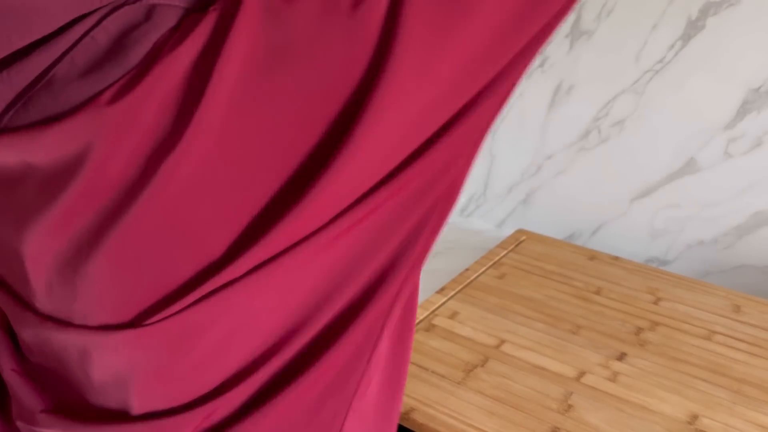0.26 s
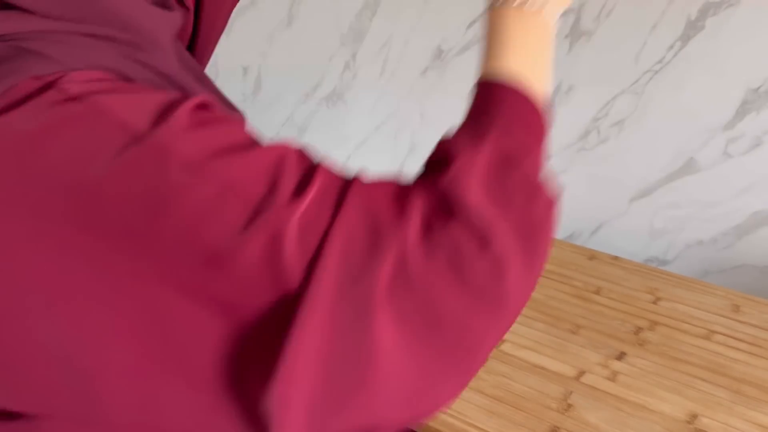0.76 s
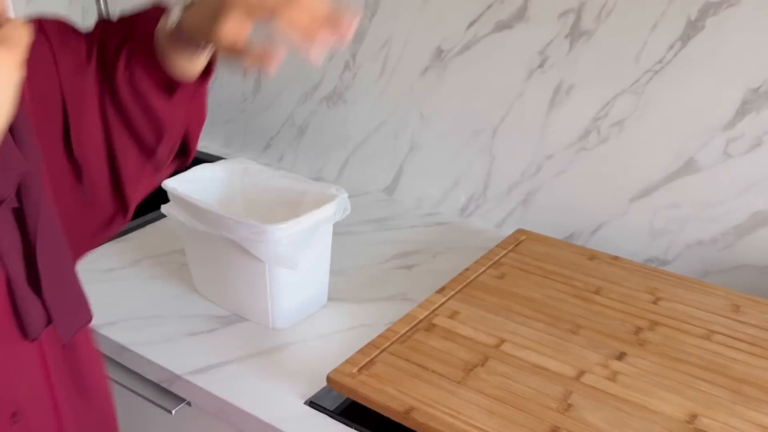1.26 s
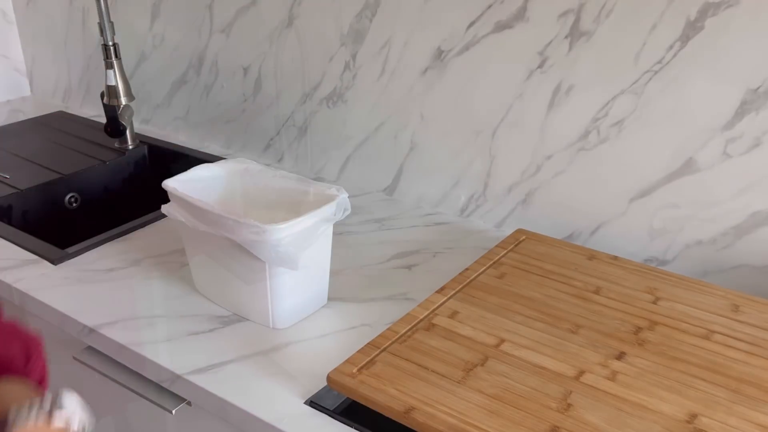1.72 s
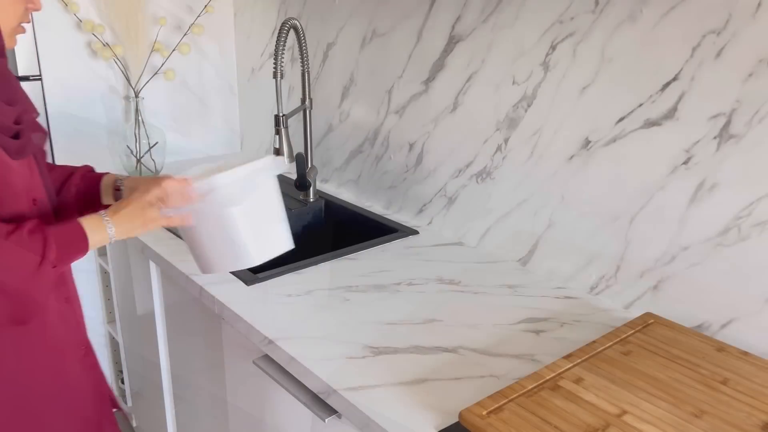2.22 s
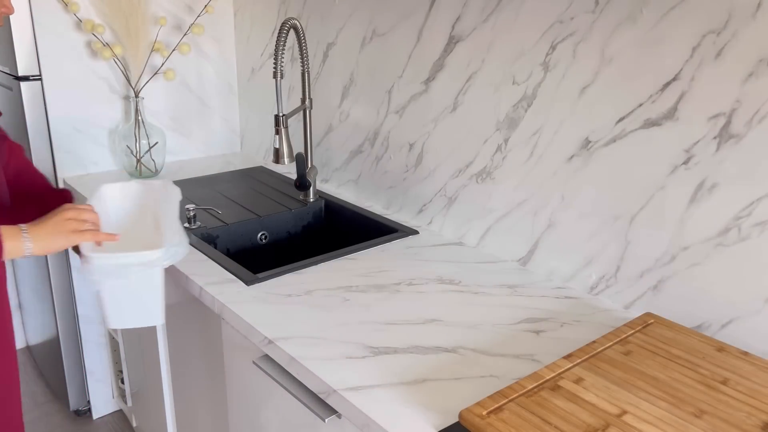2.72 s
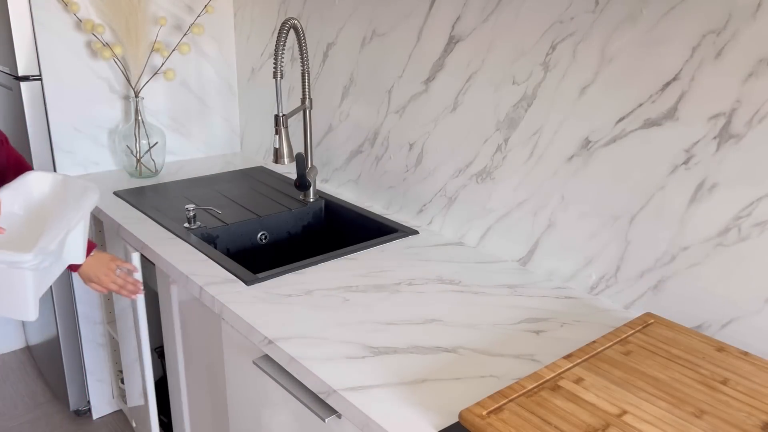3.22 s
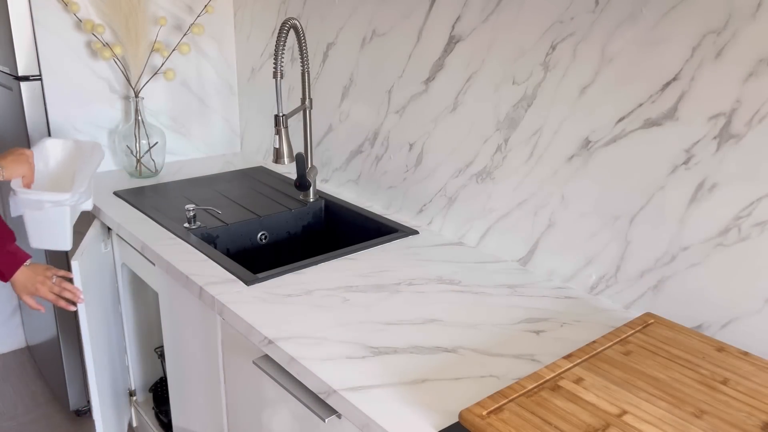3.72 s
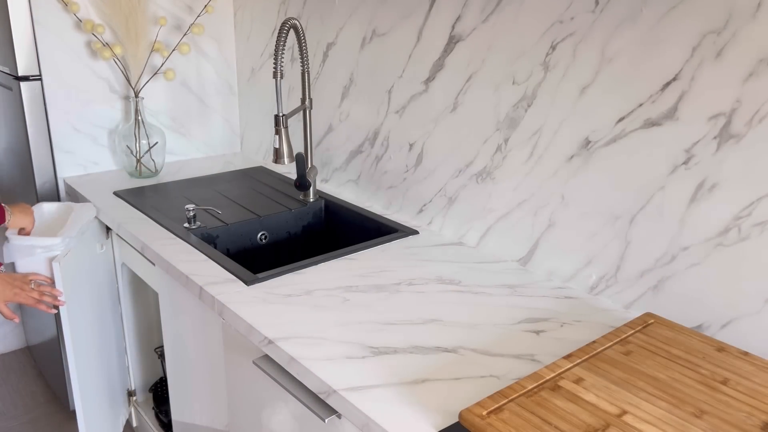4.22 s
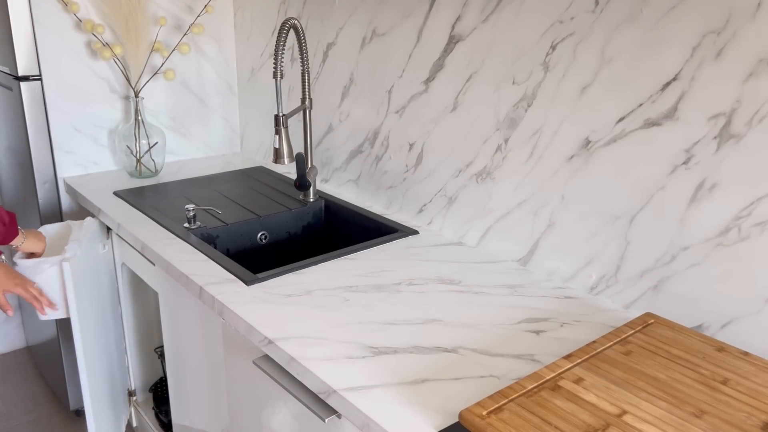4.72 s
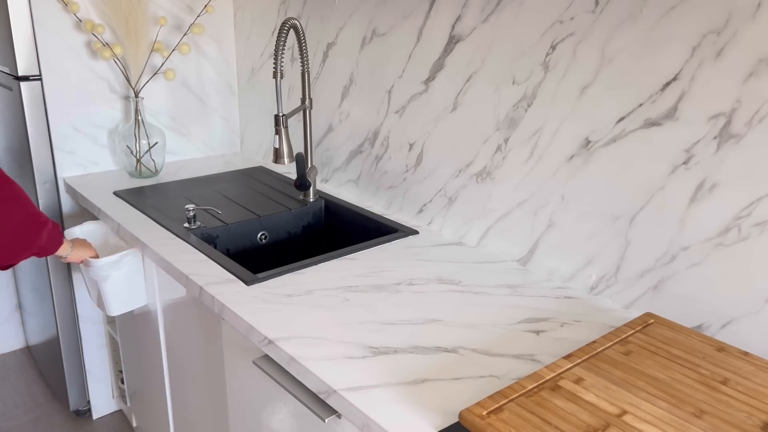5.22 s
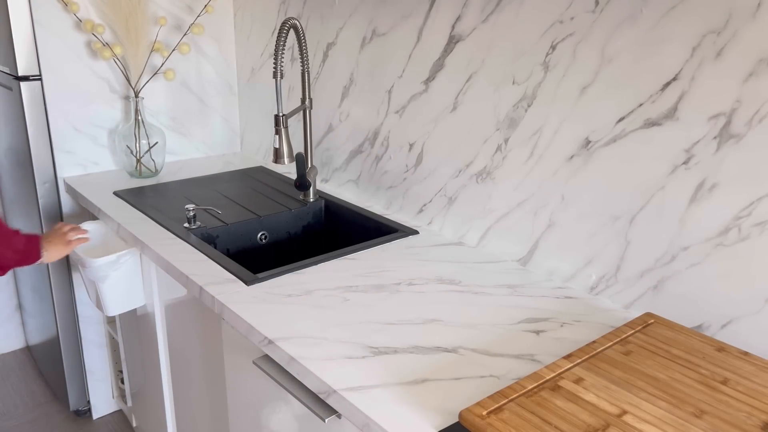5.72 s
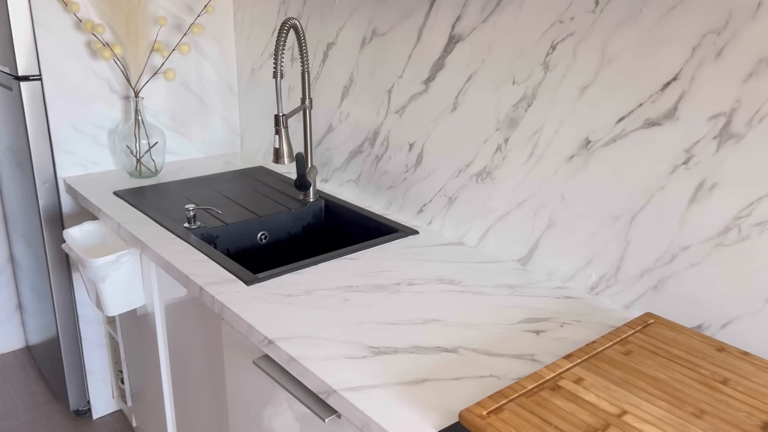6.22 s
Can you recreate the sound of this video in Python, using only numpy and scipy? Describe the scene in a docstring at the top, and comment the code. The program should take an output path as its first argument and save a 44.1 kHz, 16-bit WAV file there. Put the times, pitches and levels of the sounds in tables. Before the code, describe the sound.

Hollow plastic knocks from a small bin and two cupboard doors shutting in a kitchen, with liner and sleeve rustle.

```python
"""A tiled kitchen: a wall cupboard is shut, then a small plastic bin with a bag liner is lifted,
hooked over a lower door, and that door is closed. Knocks ring the bin and the chipboard doors, each
with a thud and a clack. Liner and sleeves rustle as clumpy noise, a bracelet tinkles, door fittings
ring and a dish hums faintly. The house rumbles underneath. A phone hears it all in stereo."""
import sys
import numpy as np
from scipy import signal
from scipy.fft import rfft, irfft, next_fast_len
from scipy.io import wavfile

SR = 44100
rng = np.random.default_rng(int(sys.argv[2]) if len(sys.argv) > 2 else 0)


def materialize(psi):
    """Save the field psi as 16-bit PCM at rate SR to the path in sys.argv[1].

    A 1-D psi becomes a single channel; in a 2-D psi each row is a channel.
    """
    bounded = np.clip(np.atleast_2d(psi).T, -1, 1)
    quanta = np.round(bounded * 32767).astype(np.int16)
    wavfile.write(sys.argv[1], SR, quanta)


N = 284930

# Knocks on the bin. Each row: start in seconds, ring in dB, favoured pitch in Hz, clack in dB.
BIN_KNOCKS = [(0.025, -5.5, 436, -41), (0.135, -18, 247, -32.5), (0.238, -30, 268, -32),
              (0.351, -26, 198, -35.5), (0.376, -27, 420, -35), (0.431, -22, 800, -32),
              (0.56, -40, 212, -37.5), (0.721, -30, 1020, -39.5), (1.655, -46.5, 705, -67),
              (1.791, -46, 263, -47.5), (2.079, -39, 353, -66), (2.175, -39, 890, -52),
              (2.236, -39.5, 420, -42), (2.297, -47, 420, -58), (2.422, -25, 295, -49),
              (2.658, -49, 598, -46), (2.786, -38.5, 895, -42.5), (2.984, -53, 202, -53),
              (3.499, -52, 384, -54), (3.828, -35, 345, -67), (3.878, -32, 266.2, -39),
              (3.936, -36, 466, -72), (4.066, -21, 338, -31), (4.189, -7.5, 449, -32.5),
              (4.337, -15, 308, -27), (4.359, -9, 488, -41), (4.402, -14.5, 310, -19.5),
              (4.459, -22.5, 680, -38), (4.718, -11, 474, -33.5), (4.848, -33, 600, -54),
              (5.2, -19.5, 471, -28.5), (5.22, -13.5, 482, -22), (5.299, -38, 297, -45),
              (5.582, -39.5, 483, -65), (5.699, -39.5, 470, -59.5)]
# The bin's walls and rim. Each row: pitch in Hz, level in dB, ring time (t60) in seconds.
BIN_MODES = [(193, 6.5, 0.026), (250.6, 2, 0.059), (308, -9, 0.22), (350, -8.5, 0.097), (400.7, -4, 0.07),
             (447.7, -0.5, 0.064), (509.2, -1, 0.07), (556, -2.5, 0.071), (575, 3, 0.031), (648, -3, 0.05),
             (726, -6, 0.073), (775, -4, 0.046), (842, 0, 0.028), (960, -1, 0.096), (1095, 1, 0.034),
             (1218, -0.5, 0.11), (1305, 20, 0.0035), (1970, -19.5, 0.0078), (2515, -8, 0.011)]
# The worktop under the bin. Each row: pitch in Hz, level in dB, ring time in seconds.
WORKTOP_THUD = [(112.6, -1, 0.18), (150.2, -4.5, 0.43)]
def plastic_bin():
    """The bin rings at each knock, and thuds more while it stands on the worktop than once lifted."""
    lifted_s, standing_thud_db, lifted_thud_db = 2.0, -8.5, -20   # thuds are relative to the ring
    knocks = [(start, db, hz, clack_db, db + (standing_thud_db if start < lifted_s else lifted_thud_db))
              for start, db, hz, clack_db in BIN_KNOCKS]
    return blows(knocks, BIN_MODES, WORKTOP_THUD, reach_oct=0.85, chatter_s=0.0075)


# Door hits. Each row: start in seconds, ring in dB, favoured pitch in Hz, clack in dB, thud in dB.
DOOR_KNOCKS = [(0.841, -6, 185.7, -28, -19), (0.852, -6, 130, -21, -26.5), (0.874, -22.5, 234, -40, -12.5),
               (0.951, -37.5, 158, -48, -47), (1.548, -47.5, 121, -77, -37),
               (2.83, -45.5, 161, -47.5, -33.5), (5.235, -20.5, 284, -27, -33),
               (5.259, -23.5, 240, -32, -25), (5.354, -28.5, 350, -50, -25.5)]
# Door panel and carcass. Each row: pitch in Hz, level in dB, ring time in seconds.
DOOR_MODES = [(106, -12, 0.26), (130.8, -2.5, 0.14), (176.6, -8.5, 0.23), (240, 3.5, 0.023),
              (287.3, -6.5, 0.11), (345, -3.5, 0.063), (420, -3, 0.024), (509, -5.5, 0.056),
              (646, -6, 0.03), (770, 2, 0.012), (1146, 1, 0.014), (1473, -2.5, 0.036), (1850, -2.5, .015),
              (2373, 1, 0.0088)]
# The room's low boom when a door shuts. Each row: pitch in Hz, level in dB, ring time in seconds.
DOOR_BOOM = [(63.66, 1, 0.3), (81, -10, 0.25)]
def doors():
    """A door meets its frame: the chipboard rings and the room gives a low boom."""
    return blows(DOOR_KNOCKS, DOOR_MODES, DOOR_BOOM, reach_oct=1.7, chatter_s=0.0074)


def blows(knocks, modes, thud_modes, reach_oct, chatter_s):
    """A touch and a dying chatter of slips ring the modes near a pitch, with thud, clack and crack."""
    off_pitch_db, slips_per_s = 6, 600   # a mode one reach from the favoured pitch loses off_pitch_db
    clack_s, crack_s, crack_db = 0.0043, .004, -25   # the crack's level is relative to the clack
    out, t = np.zeros(N + SR), np.arange(SR // 2) / SR
    clack_band = signal.butter(1, [750, 2800], "band", fs=SR, output="sos")
    crack_band = signal.butter(2, [2500, 9000], "band", fs=SR, output="sos")
    thud = peak_one(sum(from_db(level) * ring(t == 0, hz, t60) for hz, level, t60 in thud_modes))
    for start, ring_db, pitch, clack_db, thud_db in knocks:
        reach = reach_oct * (300 / pitch) ** .45   # higher blows are more local
        noise = rng.standard_normal((3, len(t)))
        noise[1:, 0] = 1.64   # the first touch is a hard click
        slips = 0.6 * noise[0] * (rng.random(len(t)) < slips_per_s / SR) * np.exp(-t / chatter_s)
        slips[0] = 0.8
        body = 0
        for k, (hz, level, t60) in enumerate(modes):
            gain = from_db(level - off_pitch_db * (np.log2(hz / pitch) / reach) ** 2)
            body += gain * (-1) ** k * ring(slips, hz, t60)
        # the dense upper modes merge into noise bursts that the chatter draws out
        clack = signal.sosfilt(clack_band, noise[1] * np.exp(-t / (clack_s + chatter_s)))
        crack = signal.sosfilt(crack_band, noise[2] * np.exp(-t / (crack_s + chatter_s)))
        attack = from_db(clack_db) * (peak_one(clack) + from_db(crack_db) * peak_one(crack))
        at = round(start * SR)
        out[at:at + len(t)] += from_db(ring_db) * peak_one(body) + from_db(thud_db) * thud + attack
    return out[:N]


# Moves of the liner, then swishes of the sleeves. Each row: start, swell and hold in seconds,
# fade in dB per second, rustle in dB, hand rubbing in dB.
LINER_MOVES = [(0.0, 0.024, 0.22, 41, -48, -41.5), (2.07, 0.03, 0.14, 25, -52, -56),
               (2.41, 0.007, 0.0072, 101, -42.5, -48), (3.1, 0.32, 0.36, 70, -59, -67.5),
               (4.064, .004, .03, 22, -51, -45), (4.33, 0.0088, 0.077, 133, -39.5, -35),
               (4.55, 0.46, .25, 95, -53, -63.5), (5.35, 0.24, 0.056, 173, -54.5, -64)]
SLEEVE_MOVES = [(.45, 0.056, .02, 50, -61, -47.5), (.71, 0.005, 0.013, 93, -47.5, -44),
                (.83, 0.049, 0.012, 128, -50, -37), (.95, 0.078, 0.12, 57, -61, -53),
                (1.69, .03, .02, 69, -58.5, -55), (1.89, 0.034, 0.017, 172, -48.5, -66),
                (2.64, 0.02, 0.2, 119.5, -57.5, -51.5), (3.876, .004, 0.016, 70, -61, -50),
                (5.75, 0.073, .05, 79, -67, -71), (6.1, 0.13, .05, 50, -70, -70.5)]
# Colours of the rustle, its crisp top and the rubbing. Each row: frequency in Hz, level in dB.
RUSTLE_TONE = [(1500, -6.5), (3000, -0.5), (5500, 1.5), (8000, 1), (10000, -14), (12000, -22.5)]
CRISP_TONE = [(7000, -9), (9500, -2), (12000, 2.5), (14000, -4), (16000, 2)]
RUBBING_TONE = [(150, -90.5), (400, -1), (900, -8.5), (1800, -7.5), (3000, -17), (5000, -83)]
def handling():
    """Liner and sleeves rustle in dense clumps, the liner crisply; hands rub more dully."""
    liner_crisp_db, sleeve_crisp_db = 1, -33
    liner, liner_rub = movements(LINER_MOVES)
    sleeve, sleeve_rub = movements(SLEEVE_MOVES)
    clumps = from_db(2.0 * drift(38) + 0.5 * drift(310))
    crisp = np.hypot(from_db(liner_crisp_db) * liner, from_db(sleeve_crisp_db) * sleeve)
    rustle = np.hypot(liner, sleeve) * coloured(RUSTLE_TONE) + crisp * coloured(CRISP_TONE)
    rubbing = np.hypot(liner_rub, sleeve_rub) * from_db(2.0 * drift(25)) * coloured(RUBBING_TONE)
    return clumps * rustle + rubbing


def movements(moves):
    """Envelopes for rustle and rubbing: each move swells, holds and fades, and overlaps add as power."""
    swell_db = 13.5
    t, power = np.arange(0, N, 64) / SR, 0
    for start, swell, hold, fade, *levels in moves:
        rise_db = np.minimum(swell_db * ((t - start) / swell - 1), 0)
        fall_db = fade * np.maximum(t - start - swell - hold, 0)
        power = power + from_db(rise_db - fall_db + np.array(levels)[:, None]) ** 2
    return [np.interp(np.arange(N) / SR, t, np.sqrt(layer)) for layer in power]


# Bracelet links, then the lower door's metal fittings.
# Each row: start in seconds, pitch in Hz, level in dB, ring time in seconds.
BRACELET_TINKLES = [(.555, 10520, -48, .12), (.612, 10210, -35, .4), (.632, 10190, -31, .5),
                    (.688, 8720, -35, .2), (.689, 8825, -30, .15), (.706, 9770, -33, .1),
                    (.715, 8880, -40, .2), (.745, 9930, -44, .2), (.852, 13450, -46, .2)]
HINGE_RINGS = [(5.24, 5480, -50, .25), (5.29, 1740, -49, .2)]
def bracelet_and_hinges():
    """Small metal parts touch, each giving one thin ring with a slightly softened attack."""
    out, soften_t60 = np.zeros(N), .008
    makeup_gain = 2 * np.log(1000) / (soften_t60 * SR)   # offsets the second resonator's boost
    for start, hz, db, t60 in BRACELET_TINKLES + HINGE_RINGS:
        ping = ring(click(start), hz, t60)
        out += from_db(db) * ring(ping, hz, soften_t60) * makeup_gain
    return out * from_db(6 * drift(200))   # loose parts keep rattling, so the rings flutter


# The dish's one note: start in seconds, pitch in Hz, level in dB, ring time in seconds.
DISH_RING = (0.35, 491.5, -50.5, 3.5)
def dish():
    """A dish in the cupboard hums with one long, faint ring."""
    start, hz, db, t60 = DISH_RING
    return from_db(db) * ring(click(start), hz, t60)


# The kitchen's tail. Each row: frequency in Hz, decay time (t60) in seconds, level in dB.
KITCHEN_TAIL = [(60.5, 0.6, -41), (121.5, 0.62, 0.5), (247, 0.38, 1), (670, 0.45, 1), (2490, 0.44, 5.5),
                (5850, 0.54, -3), (13900, 0.083, -22.5)]
def kitchen_reverb(sound):
    """Reflections off the tiles: a diffuse tail that builds almost at once and dies band by band."""
    t = np.arange(SR) / SR
    hz, noise = diffuse_noise(SR)
    bands, tail = np.array(KITCHEN_TAIL), 0
    for centre in 40 * 2 ** np.arange(0, 9, .5):   # overlapping half-octave bands
        share = np.cos(np.pi * np.clip(np.log2(hz / centre), -.5, .5)) ** 2
        t60, db = at_hz(bands[:, :2], centre), at_hz(bands[:, ::2], centre)
        decay = from_db(db - 60 * t / t60) / np.sqrt(t60 * SR / 7)
        tail = tail + irfft(noise * share, SR) * decay
    tail *= 1 - np.exp(-t / 0.0004)
    return signal.fftconvolve(sound[None], tail, axes=1)[:, :N]


# The rumble's fader ride. Each row: time in seconds, level in dB.
RUMBLE_RIDE = [(0.0, -27.5), (0.27, -42), (1.06, -37), (1.64, -45), (3.92, -47.5), (4.3, -38.5),
               (4.62, -45), (6.46, -49)]
# The rumble's colour. Each row: frequency in Hz, level in dB.
RUMBLE_TONE = [(25, -46), (42, 10.5), (58, -4), (66, 16.5), (74, -2.5), (100, 3.5), (130, -17.5),
               (200, -52.5)]
def house_rumble():
    """The house rumbles: deep noise that rises and sinks."""
    level_db = np.interp(np.arange(N) / SR, *np.transpose(RUMBLE_RIDE))
    return from_db(level_db) * coloured(RUMBLE_TONE)


# The room tone's colour. Each row: frequency in Hz, level in dB.
AIR_TONE = [(90, -29), (140, -3), (200, -1.5), (400, -10), (1000, -15.5), (2000, -26), (3500, -42.5),
            (8000, -42), (11000, -64), (16000, -70)]
def room_tone():
    """A steady, dark bed of quiet noise."""
    return from_db(-56) * coloured(AIR_TONE)


# Width of diffuse sound. Each row: frequency in Hz, left-right likeness from 0 (wide) to 1 (mono).
STEREO_LIKENESS = [(60, 0.91), (125, .93), (300, 0.69), (700, 0.04), (1500, 0.2), (8000, 0.037)]
def diffuse_noise(size):
    """Spectrum of stereo white noise whose channels agree in the bass and part in the treble."""
    hz = np.arange(1, size // 2 + 2) * SR / size
    mid, side = rfft(rng.standard_normal((2, size)))
    alike = np.clip(at_hz(STEREO_LIKENESS, hz), 0, 1)
    return hz, np.sqrt(1 + alike) * mid + np.sqrt(1 - alike) * side * [[1], [-1]]


def coloured(tone):
    """Diffuse stereo noise in the given colour, at an rms of 1."""
    size = next_fast_len(N + N % 2)
    size += size % 2
    hz, spectrum = diffuse_noise(size)
    noise = irfft(spectrum * from_db(at_hz(tone, hz)), size)[:, :N]
    return noise / np.sqrt(np.mean(noise ** 2) + 1e-20)


def ring(clicks, hz, t60):
    """A unit click sets a sine of height 1 ringing."""
    decay, step = from_db(-60 / (max(t60, .005) * SR)), 2 * np.pi * hz / SR
    return signal.lfilter([0, np.sin(step)], [1, -2 * decay * np.cos(step), decay ** 2], clicks + 1e-18)


def drift(rate_hz):
    """A random wander, roughly 1 either way."""
    steps = rng.standard_normal(int(N / SR * rate_hz) + 3)
    return np.interp(np.arange(N) / SR * rate_hz, np.arange(len(steps)), steps)


def click(start):
    return np.arange(N) == round(start * SR)


def at_hz(curve, hz):
    frequencies, values = np.transpose(curve)
    return np.interp(np.log(hz), np.log(frequencies), values)


def from_db(db):
    return 10 ** (np.asarray(db) / 20)


def peak_one(x):
    return x / np.abs(x).max()


def scene():
    """Knocks and rings sit slightly right, with reverb around them, over handling, rumble and room tone."""
    knocks_db, left_minus_right_db = 1.5, -2
    struck = from_db(knocks_db) * (plastic_bin() + doors()) + dish() + bracelet_and_hinges()
    direct = struck * from_db([[left_minus_right_db / 2], [-left_minus_right_db / 2]])
    return direct + kitchen_reverb(struck) + handling() + house_rumble() + room_tone()


# The brighter left port. Each row: frequency in Hz, lift of left over right in dB.
LEFT_LIFT = [(500, 1.3), (2500, 2), (4200, 4.5), (5500, 9.5), (7000, 4), (8500, 4)]
def record(dry):
    """The phone's two ports colour the stereo image; deep bass is cut, peaks clip, the top is cut."""
    one_port_hz, in_phase_hz, turn_hz, right_lag_s = 8300, 8530, 3600, 3.5e-5
    size = next_fast_len(N + 4096)
    left, right = rfft(dry, size)
    hz = np.arange(1, len(left) + 1) * SR / size
    lift = from_db(at_hz(LEFT_LIFT, hz) / 2)
    lag = np.exp(-2j * np.pi * hz * right_lag_s)
    two_ports = np.array([left * lift, right / lift * lag])
    # the top comes from the left port alone, its phase turned between the channels
    turn = np.exp(1j * np.pi * (hz - in_phase_hz) / turn_hz)
    one_port = np.array([left / turn, left * turn])
    top_share = 1 / (1 + (one_port_hz / hz) ** 24)
    stereo = irfft((1 - top_share) * two_ports + top_share * one_port, size)[:, :N]
    low_cut = signal.butter(4, 48, "high", fs=SR, output="sos")
    high_cut = signal.ellip(12, .5, 80, 15780, fs=SR, output="sos")
    clipped = np.clip(signal.sosfilt(low_cut, stereo), -1, 1)
    return signal.sosfilt(high_cut, clipped)


dry = scene()
out = record(dry)
materialize(out)
```